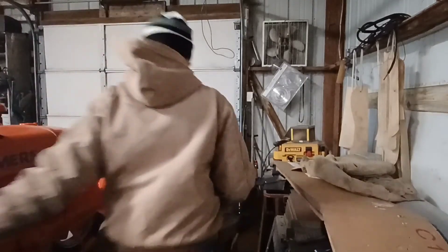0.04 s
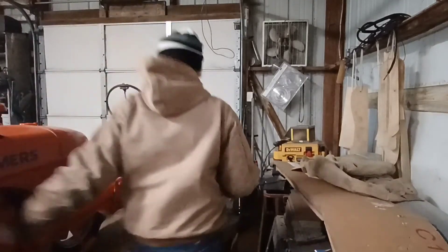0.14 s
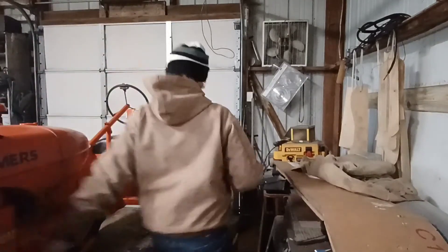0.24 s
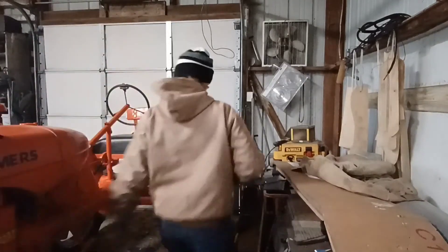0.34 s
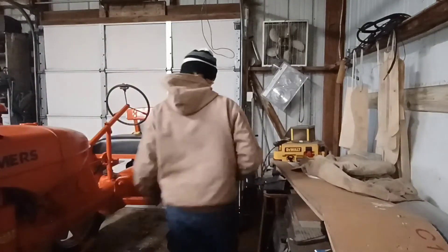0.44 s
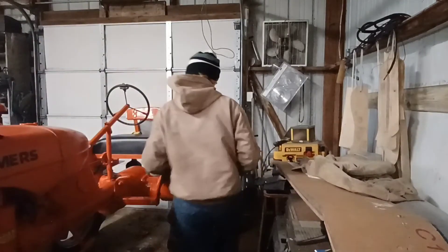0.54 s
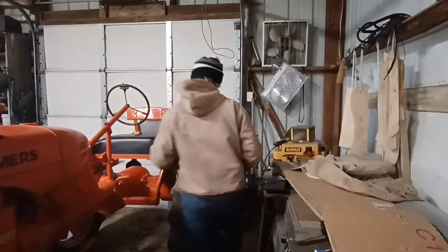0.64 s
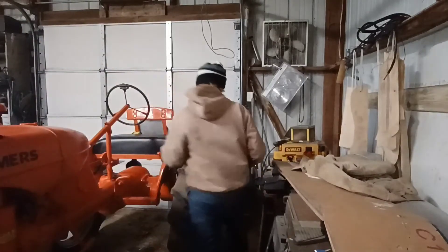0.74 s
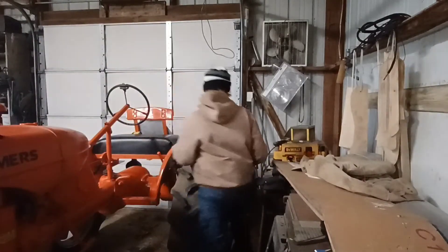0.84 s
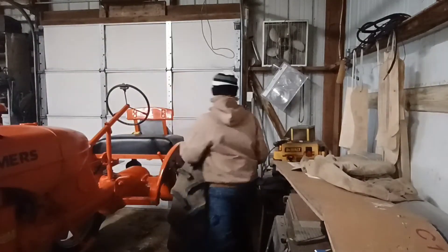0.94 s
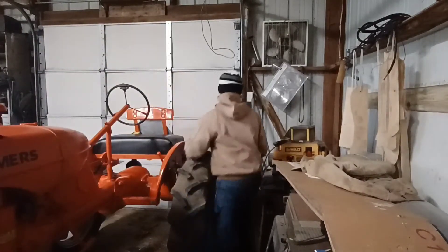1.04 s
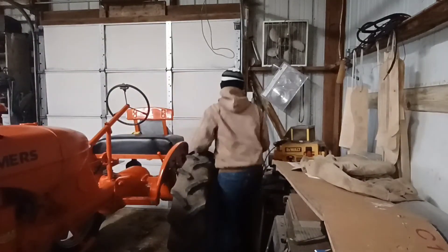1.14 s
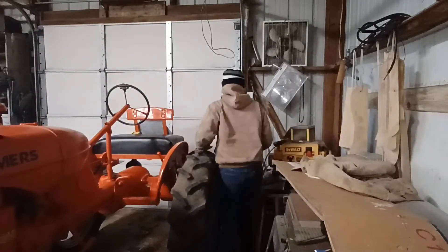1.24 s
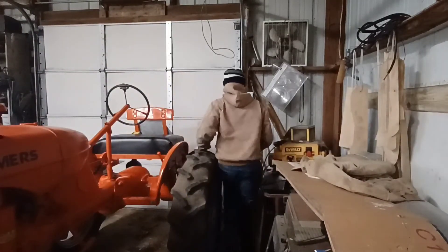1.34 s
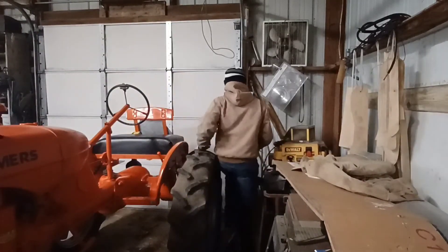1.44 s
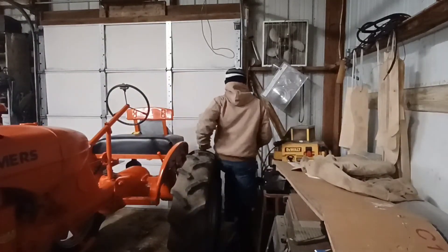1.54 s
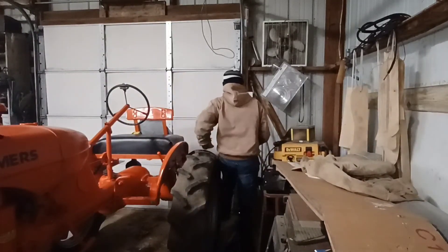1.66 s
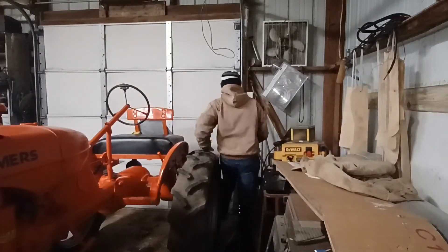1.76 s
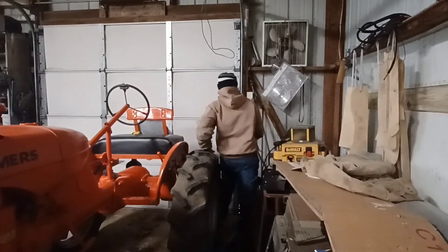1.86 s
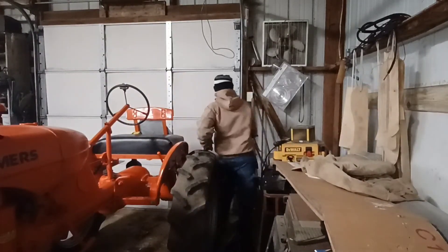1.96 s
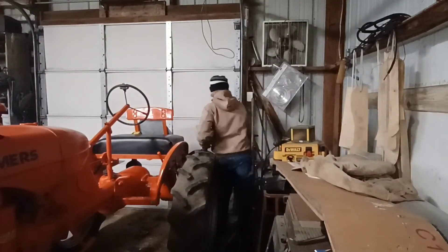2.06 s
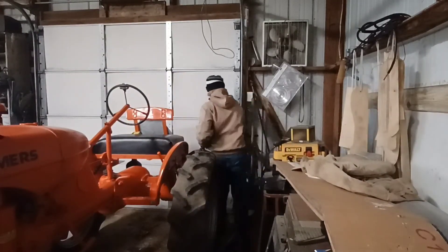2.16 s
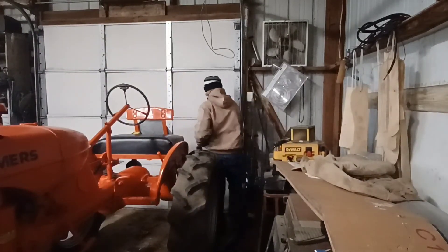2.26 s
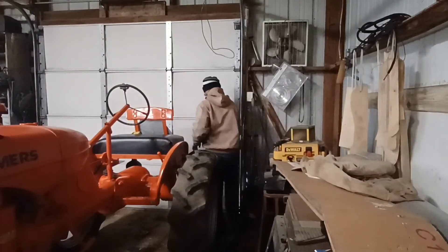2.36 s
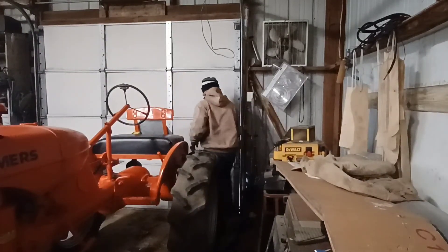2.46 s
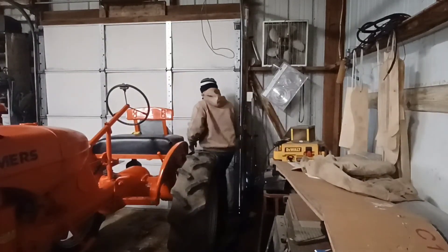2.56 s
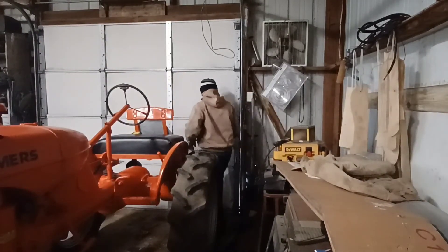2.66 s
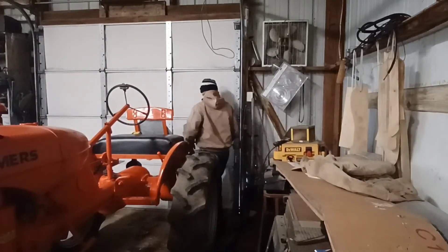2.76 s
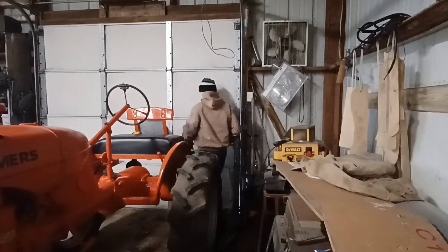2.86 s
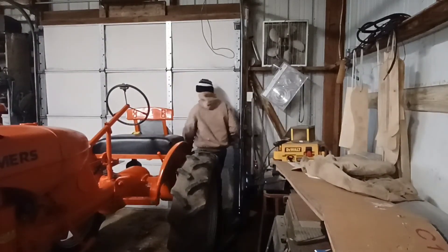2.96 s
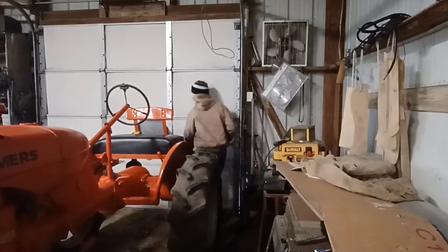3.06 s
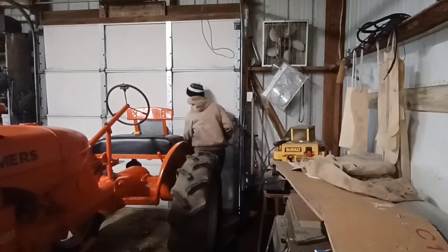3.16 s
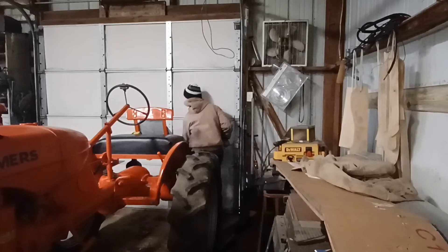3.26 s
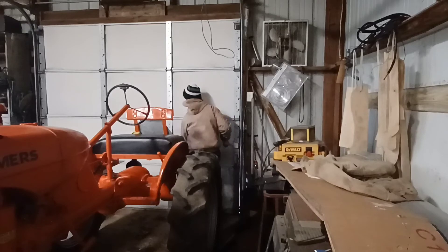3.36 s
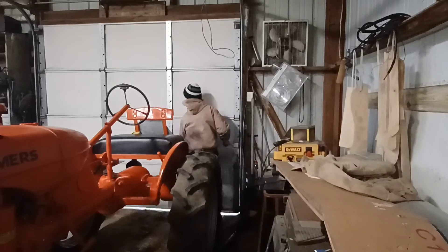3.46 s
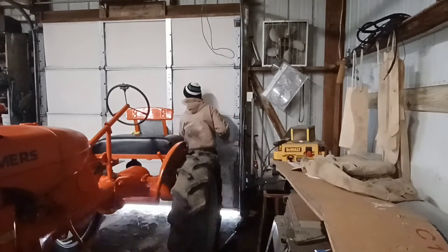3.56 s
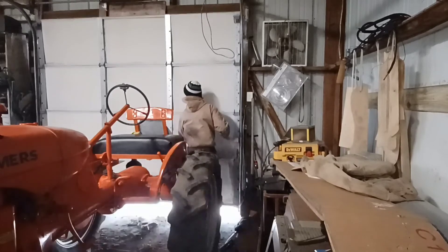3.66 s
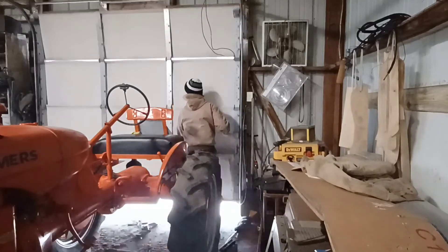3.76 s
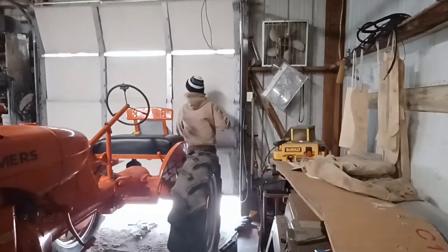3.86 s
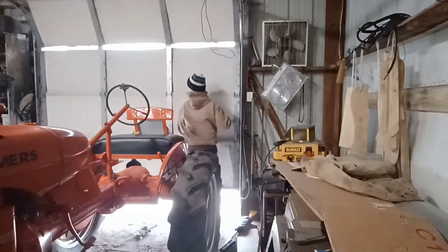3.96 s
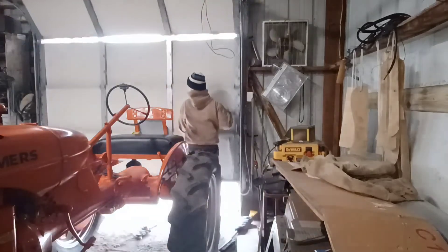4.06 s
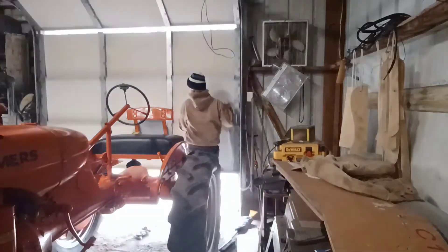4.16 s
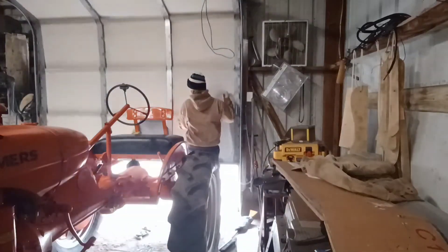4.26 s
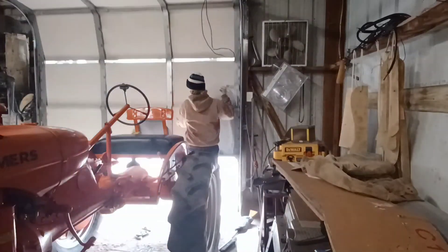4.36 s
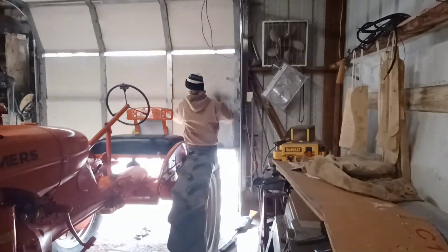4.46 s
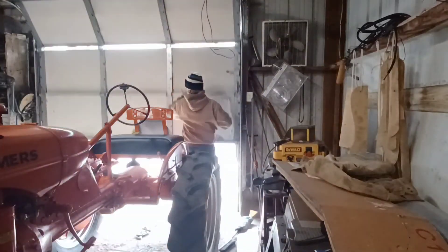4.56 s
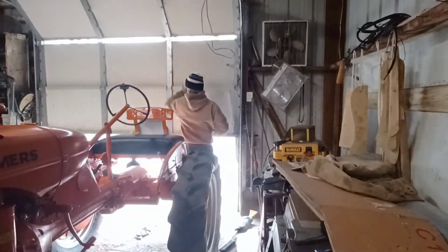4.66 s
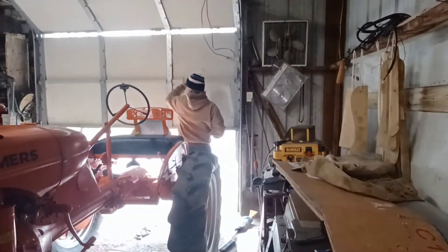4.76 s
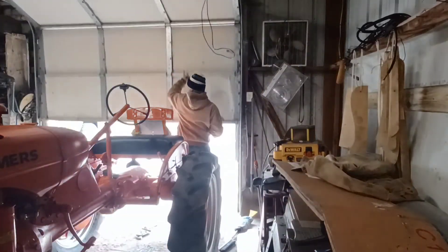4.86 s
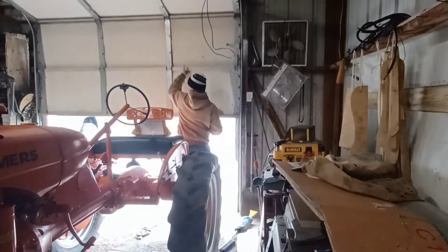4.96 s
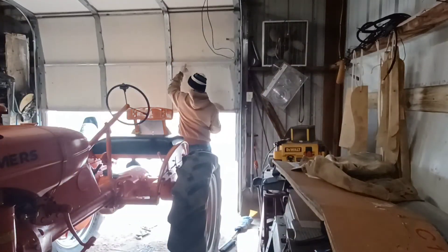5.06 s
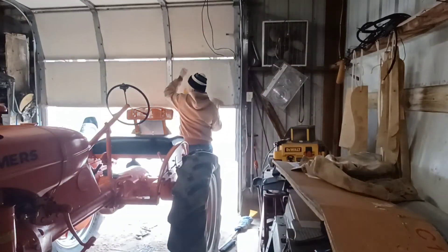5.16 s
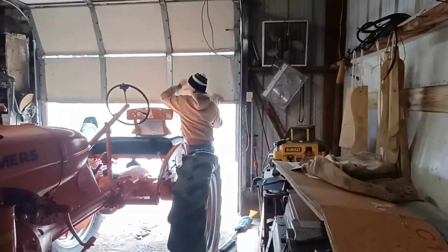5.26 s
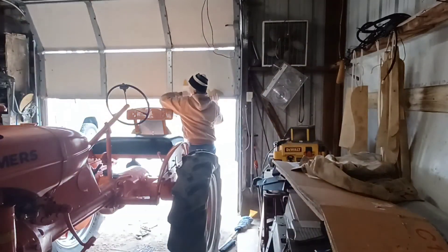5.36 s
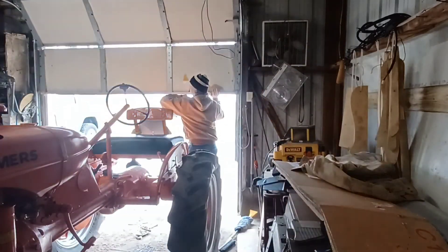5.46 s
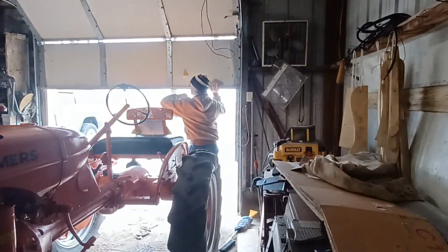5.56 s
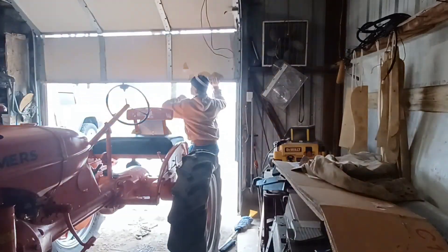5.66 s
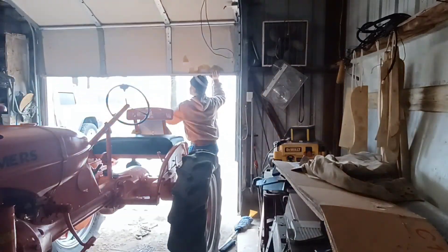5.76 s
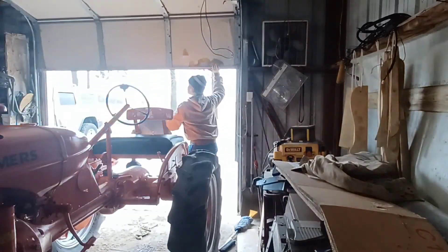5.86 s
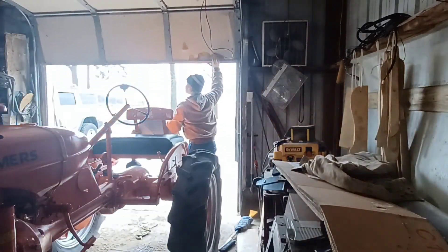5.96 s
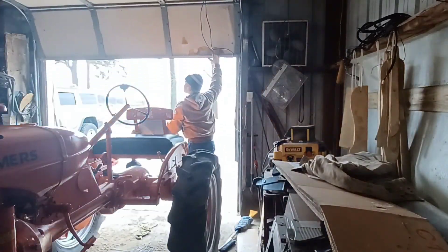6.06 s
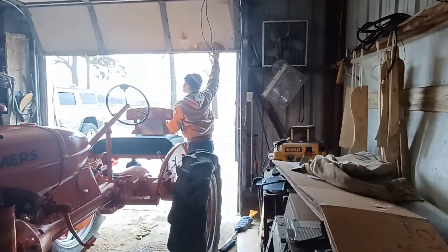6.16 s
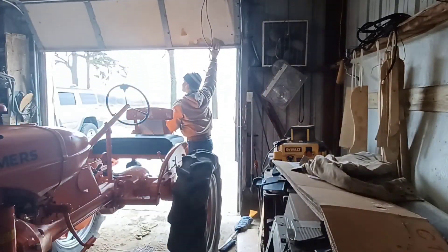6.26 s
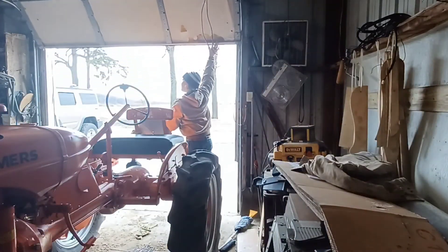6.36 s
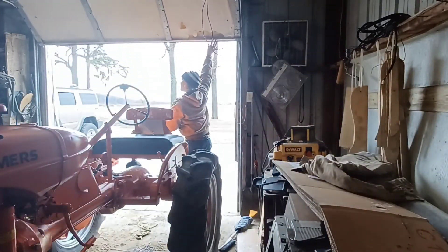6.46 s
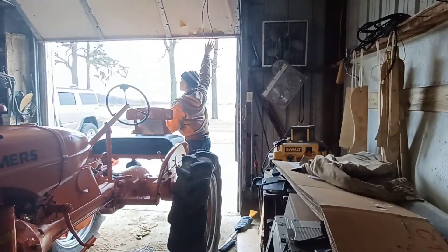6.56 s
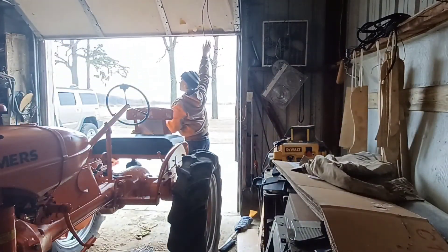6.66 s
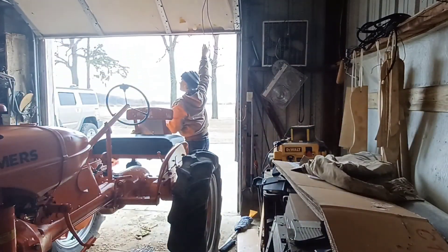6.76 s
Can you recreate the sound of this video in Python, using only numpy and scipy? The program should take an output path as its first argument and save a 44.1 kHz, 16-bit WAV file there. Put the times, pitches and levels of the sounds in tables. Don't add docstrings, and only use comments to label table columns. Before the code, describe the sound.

Boots scuff and knock across a farm workshop, then a steel latch clangs and a sectional overhead door booms, rattles and clacks up its tracks.

```python
import sys
import numpy as np
from scipy import signal
from scipy.io import wavfile
from scipy.ndimage import uniform_filter1d

SR = 44100
rng = np.random.default_rng(int(sys.argv[2]) if len(sys.argv) > 2 else 0)


def magnitude_from_level(level_db):
    exponent = np.asarray(level_db, float) / 20
    return 10 ** exponent


def master_out(mix):
    frames = np.transpose(np.atleast_2d(mix))
    ceiling = np.clip(frames, -1, 1)
    pcm = np.round(ceiling * 32767).astype(np.int16)
    wavfile.write(sys.argv[1], SR, pcm)


N = 300321
HOP = 16
HOPS = N // HOP + 1

# start_s,
# panel_db, clack_db, tick_db
LATCH = [(2.454, -54, -38.5, -46), (2.626, -34, -41, -44.5), (2.678, -45, -39, -43), (2.691, -30, -28, -31),
         (2.71, -20, -25, -18.5), (2.728, -7, -15.5, -10), (2.733, -7.5, -15, -41), (2.775, -17, -35, -35),
         (2.84, -12.5, -28, -55), (2.875, -32, -29, -54), (3.009, -52, -63, -60), (3.173, -34, -41.5, -42),
         (3.205, -39, -39.5, -39), (3.235, -45, -43, -41.5), (3.311, -57, -47.5, -53),
         (3.396, -47, -51, -52), (3.524, -32, -43, -57), (3.56, -22.5, -35, -45), (3.664, -41, -38, -38.5),
         (3.712, -9, -42, -42), (3.718, -26, -27.5, -28.5)]
# start_s, panel_db, clack_db
HINGES = [(3.745, -14, -30), (3.812, -8.5, -28.5), (3.902, -12, -27.5), (3.989, -10.5, -24),
          (4.116, -8, -20.5), (4.244, -6.5, -24.5), (4.569, -13.5, -24.5), (4.779, -37, -23),
          (4.908, -32, -20), (4.969, -31, -21.5), (5.261, -22, -24.5), (5.499, -15, -18.5),
          (5.547, -12, -23), (5.678, -11, -50), (5.822, -9.5, -33), (5.925, -12.5, -23),
          (6.001, -18, -22.5), (6.3, -14, -28), (6.476, -9.5, -26)]
# time_s, panel_shaking_db, roller_rattle_db
ROLL = [(3.3, -71, -89), (3.6, -50.5, -53.5), (3.71, -28, -39), (3.77, -31, -31), (3.89, -37, -36),
        (3.92, -18.5, -29.5), (4.06, -27, -30.5), (4.17, -24.5, -24.5), (4.4, -22.5, -26.5),
        (4.65, -25.5, -30), (4.9, -22.5, -31), (5.12, -29.5, -32), (5.31, -27, -34.5), (5.54, -25, -31.5),
        (5.92, -25.5, -29.5), (6.09, -25, -33), (6.6, -28.5, -38), (6.81, -29, -49.5)]
# start_s, pitch_hz,
# level_db, decay_60db_s
FITTINGS = [(2.678, 1760, -26.5, 0.41), (2.68, 13600, -56, .12), (2.694, 4800, -24, 0.22),
            (2.709, 5200, -26, 0.092), (2.709, 4550, -28, .1), (2.738, 229.6, -12.5, .25),
            (2.706, 1790, -23, 0.063), (2.729, 11200, -21, .092), (2.729, 12540, -19, .1),
            (2.729, 14060, -23, 0.092), (2.74, 3480, -27, 0.24), (3.173, 4700, -38, 0.015),
            (3.2, 95, -42, 1.6), (3.34, 70, -47, 1.1), (3.175, 6000, -46, .04), (3.719, 4640, -27, 0.055),
            (3.719, 5120, -35, 0.061), (3.719, 11700, -27, 0.027), (3.745, 13800, -33, .1),
            (3.74, 2910, -29, 0.16), (3.75, 3410, -29, 0.066), (3.902, 4900, -35, 0.036),
            (5.928, 5600, -35, .05), (6.48, 12400, -28, 0.016), (6.6, 482, -28, 2.7)]
# start_s, pitch_hz, level_db, decay_60db_s
BUMPED = [(.04, 2530, -65, 1.2), (.84, 770, -48, 0.16), (1.008, 1100, -25.5, 0.098),
          (1.008, 1510, -36, .15), (1.03, 2100, -38, .25), (1.04, 5530, -47, .2), (1.05, 3000, -40, 0.21),
          (1.05, 4200, -46, .25), (2.02, 600, -47, 0.34), (2.256, 680, -37, 0.65), (2.256, 4600, -48, .2)]
# pitch_hz, width_hz, level_db
PANEL_MODES = [(102.8, 15, 2), (230, 15, 1), (301, 8.1, 0.5), (380, 19.5, -1), (403.5, 39, 5.5),
               (477, 22, 4.5), (582, 19, -14), (1532, 48, -0.5), (1956, 620, -7), (4740, 17, -18)]
# pitch_hz, level_db_per_hz
DOOR_COLOUR = [(18, -63), (30, -32.5), (98, -8.5), (170, -5), (215, 1), (319, -2), (394, -8.5), (721, -9.5),
               (1500, -16), (4780, -27), (8300, -36.5), (13000, -31), (14800, -37.5), (16000, -37)]
# start_s, knock_db, scuff_db, contact_length_s
STEPS = [(0.002, -47, -53.5, 0.0053), (0.365, -42, -59, 0.012), (0.485, -64, -48, 0.02),
         (0.515, -64, -50, 0.014), (0.577, -49, -60, 0.012), (0.804, -47, -59.5, 0.0045),
         (0.835, -34.5, -52, 0.041), (0.883, -62, -42.5, 0.051), (0.972, -33, -56, 0.014),
         (1.004, -22.5, -29, 0.02), (1.034, -29, -29, 0.02), (1.052, -21, -29.5, 0.019),
         (1.285, -22, -38.5, 0.028), (1.337, -45, -42, 0.014), (1.47, -42, -39, 0.013),
         (1.908, -51, -75, 0.032), (2.012, -32.5, -55, 0.013), (2.057, -44, -53, 0.047),
         (2.226, -51, -50.5, 0.023), (2.248, -19, -32.5, 0.02), (2.27, -21, -29, 0.033),
         (2.325, -28, -62, 0.016)]
# time_s, effort_db
SHUFFLE = [(0.0, -59), (0.1, -65), (0.3, -57), (0.385, -51), (0.45, -68), (0.55, -61), (0.66, -80),
           (0.78, -100), (0.95, -56), (1.06, -36.5), (1.2, -62), (1.34, -49), (1.7, -69), (1.85, -74),
           (2.07, -60), (2.2, -90), (2.4, -63), (2.6, -92)]
# pitch_hz, width_hz, level_db
FLOORBOARD_MODES = [(106, 8.3, -7), (247, 15, -2), (380, 17, -7), (680, 5.7, -6.5), (980, 65, -44)]
# pitch_hz, level_db_per_hz
BOOT_COLOUR = [(18, -60), (30, -28), (95, -4), (374, 3.5), (449, -2.5), (554, 3), (760, -9.5), (988, -9),
               (2900, -18.5), (8080, -43.5), (13000, -40.5), (16000, -55)]
# time_s, level_db
DRAG = [
    (0.186, -73),
    (0.2, -44),
    (0.288, -50),
    (0.322, -44),
    (0.5, -57),
    (0.57, -74),
    (0.64, -61),
    (0.68, -81),
]
# pitch_hz, width_hz, level_db
BENCH_MODES = [
    [(236, 48, -5), (271, 23, -2.5), (386.5, 23, -10)],
    [(98, 29, 3), (131, 26, 2)],
]
# pitch_hz, level_db_per_hz
AIR_COLOUR = [(18, -49), (30, -11), (73, 2.5), (215, 2), (702, -11), (1720, -25), (3310, -13.5),
              (3770, -15), (7470, -18), (9970, -18), (16000, -19)]
# pitch_hz, decay_60db_s
SHOP_DECAY = [(60, 0.84), (250, 0.63), (800, 0.57), (4000, 0.63), (12000, 0.51)]
# pitch_hz, level_db
EARLY = [(150, -8), (500, 4), (2000, 11), (10000, 16)]
# pitch_hz, side_over_mid_db
WIDTH = [(60, -24), (110, -21.5), (200, -19.5), (380, -10.5), (700, -2.5), (1290, 1), (2380, -1.5),
         (4400, 0), (8120, 0), (15000, 0)]
# pitch_hz, left_over_right_db
TILT = [(60, 1), (110, -1.0), (200, 0.5), (380, -2), (700, 0), (1290, -1.5), (2380, 0.5), (4400, -4.5),
        (8120, 6), (15000, -7.5)]
# low_hz, high_hz
REGISTERS_HZ = [(160, 650), (28, 160), (650, 4000), (4000, 15500)]
BLEND_HZ = [130, 190, 470, 1000, 3000, 5300]
BLEND_REGISTER = [1, 0, 0, 2, 2, 3]
# pitch_hz, width_hz, depth_0_to_1
PORT_NOTCH = (8360, 2500, 0.39)


def door():
    layers = []
    for s, shake_db, rattle_db in ROLL:
        boom_db = -31.5 + 1.23 * (shake_db + 30)
        hiss_db = -36 + 1.26 * (rattle_db + 30)
        layers.append((s, shake_db, boom_db, rattle_db, hiss_db))
    travel = in_time(layers, fade_s=0.12)
    trim = magnitude_from_level(2 * np.array([[-2.5], [-4.0], [-2.5], [-2.5]]))
    rolling = travel * trim * grains(per_s=1200, spread_db=2.4) * clumps()
    blows = contacts(door_blows(), offset_db=[-14.5, -20.5, -12.5, -15.5])
    panels = in_shop(blows, rolling, DOOR_COLOUR, PANEL_MODES, rise_cycles=1.18, early_s=0.0023,
                     floor_db=-np.inf)
    rattle = loose_parts(footfalls() + door_blows(), travel, chatter_db=-0.5, jolt_db=-9.5)
    return panels + rattle + hardware(tail_db=-3.5, tail_t60=0.26)


def door_blows():
    latch = [(*row, 0.017) for row in LATCH]
    hinges = [(s, panel_db, clack_db, clack_db - 4, 0.024) for s, panel_db, clack_db in HINGES]
    return latch + hinges


def clumps():
    bunches_per_s, swell_db = 5.5, 1.5
    r = np.exp(-2 * np.pi * bunches_per_s * HOP / SR)
    slow = signal.lfilter([1], [1, -2 * r, r * r], rng.standard_normal(HOPS + 2000))[2000:]
    power = magnitude_from_level(2 * swell_db * rms_one(slow))
    return power / power.mean()


def loose_parts(events, steady, chatter_db, jolt_db):
    knocks_per_s, ring_cycles = 370, 118
    out, pitches = np.zeros((2, N)), np.geomspace(800, 14500, num=32)
    sizes = magnitude_from_level(2.75 * np.minimum(rng.exponential(1, N), 4)) * (rng.random(N) < knocks_per_s / SR)
    dealt = rng.integers(0, len(pitches), N)
    places = rng.uniform(0, 2 * np.pi, len(pitches))
    events, totals_db = np.array(events), register_db(DOOR_COLOUR)
    at = (events[:, 0] * SR).astype(int)
    jumps_db = rng.normal(0, 6.6, (len(events), len(pitches)))
    for k, hz in enumerate(pitches):
        register = 2 + (hz > REGISTERS_HZ[3][0])
        moving = np.sqrt(np.repeat(steady[register], HOP)[:N])
        clicks = sizes * (dealt == k) * moving * magnitude_from_level(chatter_db)
        clicks[at] += magnitude_from_level(events[:, register] + jolt_db + jumps_db[:, k])
        r = magnitude_from_level(-60 * hz / SR / (ring_cycles * np.sqrt(hz / 3000)))
        w = 2 * np.pi * hz / SR
        ring = signal.lfilter([0, np.sin(w)], [1, -2 * r * np.cos(w), r * r], clicks + 1e-18)
        share = magnitude_from_level(at_hz(DOOR_COLOUR, hz) - totals_db[register]) * np.sqrt(hz / SR)
        out += share * ring * [[np.cos(places[k])], [np.sin(places[k])]]
    return out


def hardware(tail_db, tail_t60):
    out, t = np.zeros((2, N + SR)), np.arange(SR // 2) / SR
    rings = list(BUMPED) + list(FITTINGS)
    waver = rng.standard_normal((len(rings), 2, len(t)))
    for (s, hz, level_db, t60), noise in zip(rings, waver):
        rise = 1 - np.exp(-t / max(0.03 * t60, 1e-4))
        ring = np.sin(2 * np.pi * hz * t) * np.exp(-np.log(1000) * t / t60)
        tail = rms_one(resonance(noise, hz, 12.0 / t60)) * np.exp(-np.log(1000) * t / tail_t60)
        at = round(s * SR)
        out[:, at:at + len(t)] += magnitude_from_level(level_db) * rise * (ring + magnitude_from_level(tail_db) * tail)
    return out[:, :N]


def walker():
    floor_db = -57 - 7.5 - 10 * np.log10(np.sum(magnitude_from_level(2 * register_db(AIR_COLOUR))))
    layers = []
    for s, effort_db in SHUFFLE:
        rustle_db = -55.5 + 0.68 * (effort_db + 60) - 3 * s
        layers.append((s, effort_db + 0.1, effort_db, rustle_db))
    drag, middle, rustle = in_time(layers, fade_s=0.1) * magnitude_from_level(2 * -9.0)
    registers = np.array([drag, drag * magnitude_from_level(2 * -8.0), middle, rustle])
    shuffle = registers * grains(per_s=2100, spread_db=2.5)
    steps = contacts(footfalls(), offset_db=[-11.5, -19.5, -12.0, -8.0])
    return in_shop(steps, shuffle, BOOT_COLOUR, FLOORBOARD_MODES, rise_cycles=0.45, early_s=0.002,
                   floor_db=floor_db)


def footfalls():
    rows = []
    for s, knock_db, scuff_db, length_s in STEPS:
        grit_db = -55.5 + 0.75 * (scuff_db + 45) - 3.5 * s
        rows.append((s, knock_db, scuff_db, grit_db, length_s))
    return rows


def cracks(events, over_db, top_hz):
    out, t = np.zeros((2, N + SR)), np.arange(SR // 50) / SR
    noises = rng.standard_normal((len(events), 2, len(t)))
    for (s, level_db), noise in zip(events, noises):
        at = round(s * SR)
        out[:, at:at + len(t)] += magnitude_from_level(level_db + over_db) * noise * np.exp(-t / 0.0004)
    band = signal.butter(2, [1200, top_hz], "band", fs=SR, output="sos")
    return signal.sosfilt(band, out[:, :N])


def bench():
    rumble_db, rumble_lag_s = -7.5, 0.056
    slips = rng.standard_normal((2, N)) * (rng.random(N) < 1500 / SR)
    slips = np.array([slips[0] + 0.23 * slips[1], slips[0] - 0.29 * slips[1]])
    push, = in_time(DRAG, fade_s=0.01)
    rumble = dying(push, rumble_lag_s) * HOP / SR / rumble_lag_s * magnitude_from_level(2 * rumble_db)
    out = 0
    for power, modes in zip([push, rumble], BENCH_MODES):
        hum = 0
        for hz, width_hz, level_db in modes:
            once = resonance(slips, hz, width_hz)
            hum = hum + magnitude_from_level(level_db) * resonance(once, hz, 1.8 * width_hz)
        out = out + rms_one(hum) * np.sqrt(np.repeat(power, HOP)[:N])
    return out


def contacts(events, offset_db):
    forces = np.zeros((4, HOPS + SR // HOP))
    t = np.arange(SR // 8 // HOP) * HOP / SR
    grit = rng.standard_normal((len(events), len(t))) ** 2
    for (s, body_db, middle_db, top_db, length_s), uneven in zip(events, grit):
        levels_db = np.array([body_db, body_db, middle_db, top_db])
        burst = uneven * np.exp(-2 * t / max(length_s, 1e-3))
        at = round(s * SR / HOP)
        forces[:, at:at + len(t)] += np.outer(magnitude_from_level(2 * (levels_db + offset_db)), burst / burst.sum())
    return forces[:, :HOPS]


def grains(per_s, spread_db):
    sizes = magnitude_from_level(2 * spread_db * np.minimum(rng.exponential(1, HOPS), 5))
    clicks = sizes * (rng.random(HOPS) < per_s * HOP / SR)
    return clicks / clicks.mean()


def in_shop(blows, steady, spectrum, modes, rise_cycles, early_s, floor_db):
    out, scale = 0, magnitude_from_level(-2 * register_db(spectrum))[:, None]
    for hz, noise in stereo_bands():
        shares = [np.interp(np.log(hz), np.log(BLEND_HZ), np.equal(BLEND_REGISTER, k)) for k in range(4)]
        shares = np.array(shares)[:, None]
        tail = (1, at_hz(SHOP_DECAY, hz) / np.log(1e6))
        early = (magnitude_from_level(2 * at_hz(EARLY, hz)), early_s)
        paths = [tail, early]
        piled = sum(share * seconds for share, seconds in paths) * SR / HOP
        blow_force = np.prod((blows * scale) ** shares, axis=0)
        steady_force = np.prod((steady * scale) ** shares, axis=0) / piled
        force = blow_force + steady_force
        power = sum(share * dying(force, seconds) for share, seconds in paths)
        power = dying(power, rise_cycles / hz) * min(1, HOP / SR * hz / rise_cycles)
        power = power * magnitude_from_level(2 * at_hz(spectrum, hz)) + magnitude_from_level(2 * (at_hz(AIR_COLOUR, hz) + floor_db))
        out = out + noise * np.interp(np.arange(N) / HOP, np.arange(HOPS), np.sqrt(power))
    return out + sum(magnitude_from_level(level_db) * resonance(out, hz, width_hz) for hz, width_hz, level_db in modes)


def stereo_bands():
    white = rng.standard_normal((2, 2, N + SR // 4))
    edges = 28 * 2 ** (np.arange(29) / 3)
    for k, (low, high) in enumerate(zip(edges, edges[1:])):
        hz = min(np.sqrt(low * high), 15000)
        band = signal.butter(2, [low, high], "band", fs=SR, output="sos")
        mid, side = signal.sosfilt(band, white[k % 2])[:, SR // 4:]
        if hz < 600:
            swell = uniform_filter1d(mid ** 2, size=int(SR / (high - low)))
            mid = mid * np.sqrt(np.mean(swell) / (swell + 0.45 * np.mean(swell)))
        side = side * magnitude_from_level(at_hz(WIDTH, hz))
        balance = magnitude_from_level(at_hz(TILT, hz) / 2 * np.array([[1], [-1]]))
        yield hz, np.array([mid + side, mid - side]) * balance


def resonance(x, hz, width_hz):
    r = np.exp(-np.pi * width_hz / SR)
    gain = (1 - r * r) / 2
    return signal.lfilter([gain, 0, -gain], [1, -2 * r * np.cos(2 * np.pi * hz / SR), r * r], x)


def dying(power, seconds):
    return signal.lfilter([1], [1, -np.exp(-HOP / SR / max(seconds, 1e-4))], power)


def in_time(rows, fade_s):
    rows = np.array(rows)
    s = np.r_[rows[0, 0] - fade_s, rows[:, 0], rows[-1, 0] + fade_s]
    hop_s = np.arange(HOPS) * HOP / SR
    return np.array([np.interp(hop_s, s, np.r_[0, magnitude_from_level(column), 0]) ** 2 for column in rows[:, 1:].T])


def at_hz(points, hz):
    pitches, values = np.array(points).T
    return np.interp(np.log(hz), np.log(pitches), values)


def register_db(spectrum):
    totals = []
    for low, high in REGISTERS_HZ:
        hz = np.linspace(low, high, num=200)
        mean_power = np.mean(magnitude_from_level(2 * at_hz(spectrum, hz)))
        totals.append(10 * np.log10(mean_power * 2 * (high - low) / SR))
    return np.array(totals)


def rms_one(x):
    return x / np.sqrt(np.mean(x ** 2) + 1e-20)


def scene():
    soles = cracks(np.array(footfalls())[:, [0, 2]], over_db=-7.5, top_hz=4520)
    steel = cracks(np.array(door_blows())[:, [0, 3]], over_db=1.0, top_hz=16000)
    return door() + walker() + bench() + soles + steel


def top_cut(x):
    return signal.sosfilt(signal.butter(12, 16230, fs=SR, output="sos"), x)


def record(dry):
    thin = signal.sosfilt(signal.butter(2, 55, "high", fs=SR, output="sos"), dry)
    notch_hz, notch_width_hz, depth = PORT_NOTCH
    thin = thin - depth * resonance(thin, notch_hz, notch_width_hz)
    rounded = np.tanh(thin)
    mix = signal.sosfilt(signal.cheby2(12, 60, 16050, fs=SR, output="sos"), rounded)
    return top_cut(mix)


dry = scene()
out = record(dry)
master_out(out)
```